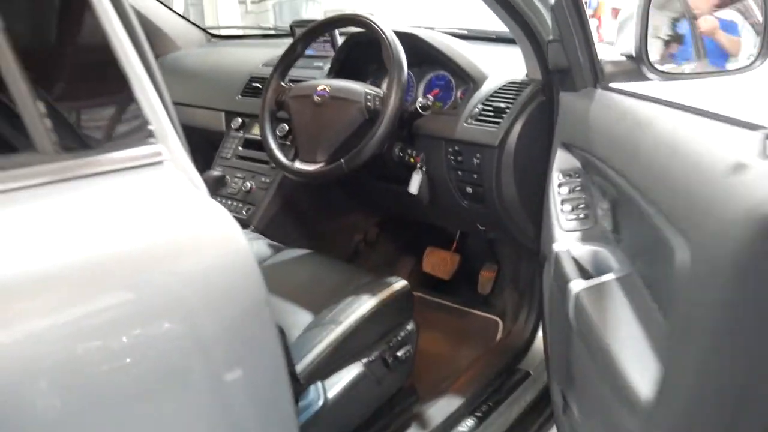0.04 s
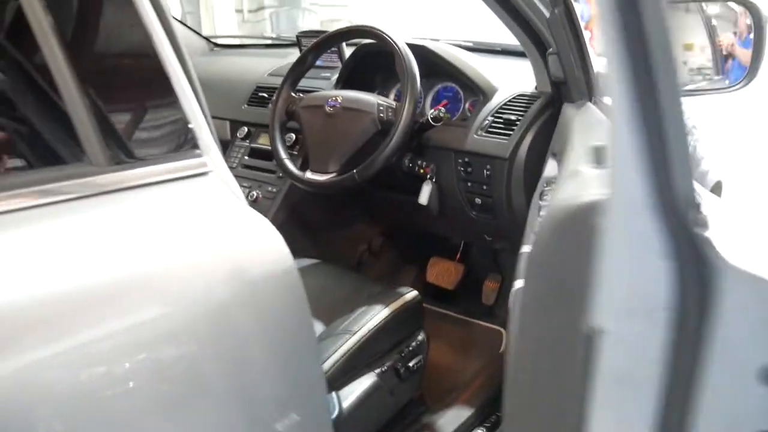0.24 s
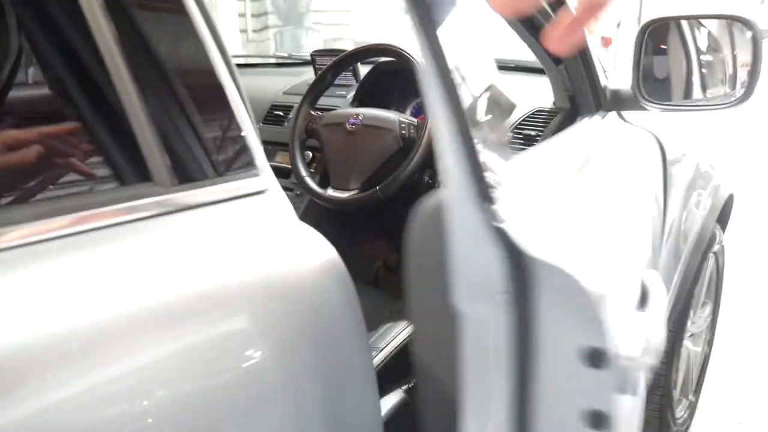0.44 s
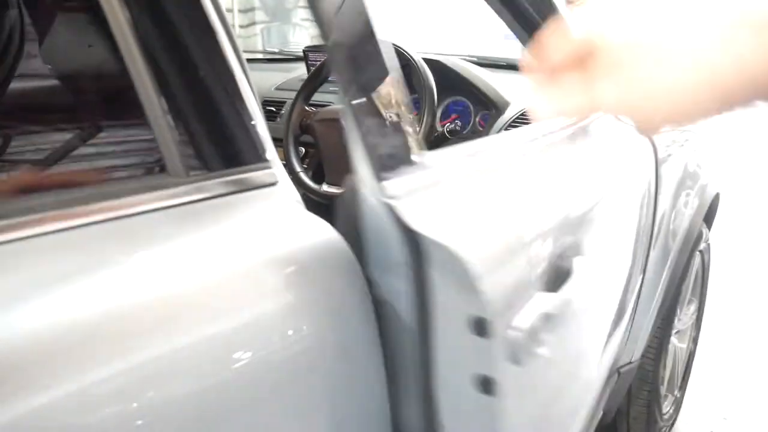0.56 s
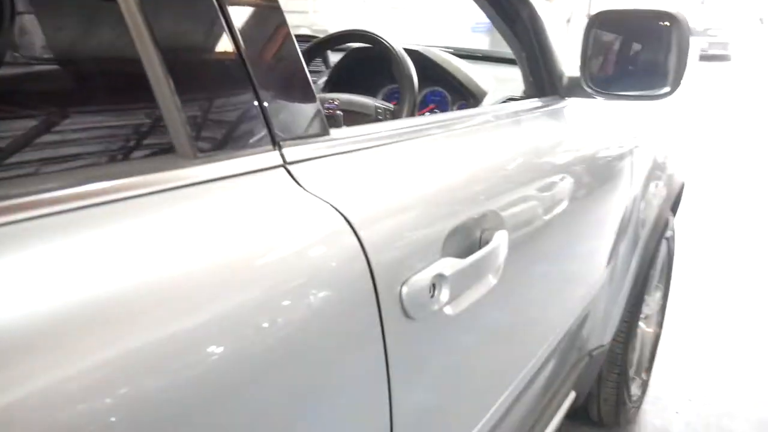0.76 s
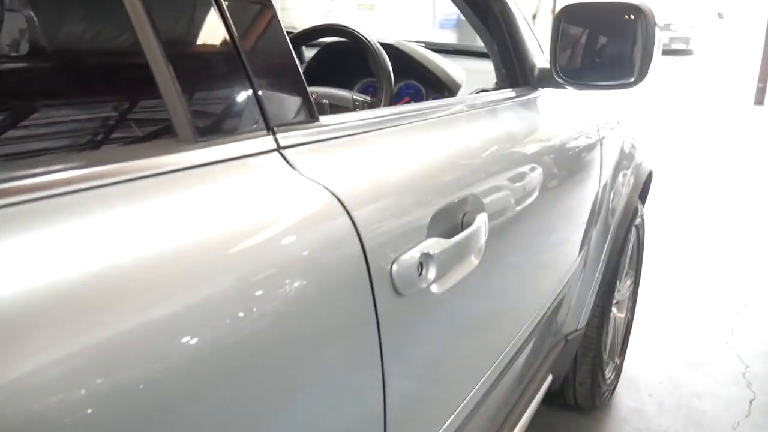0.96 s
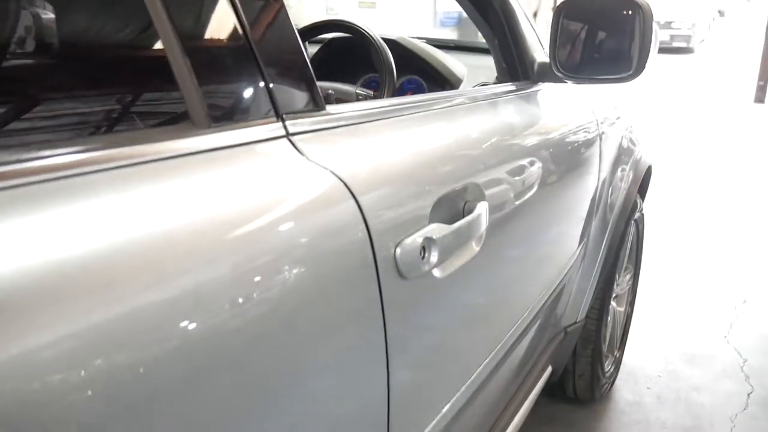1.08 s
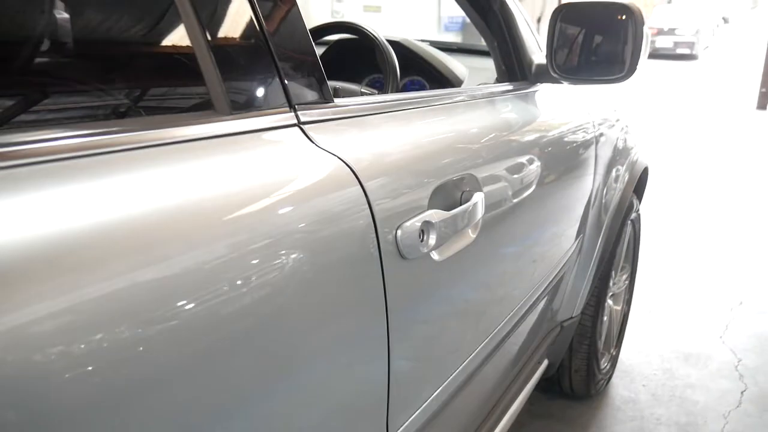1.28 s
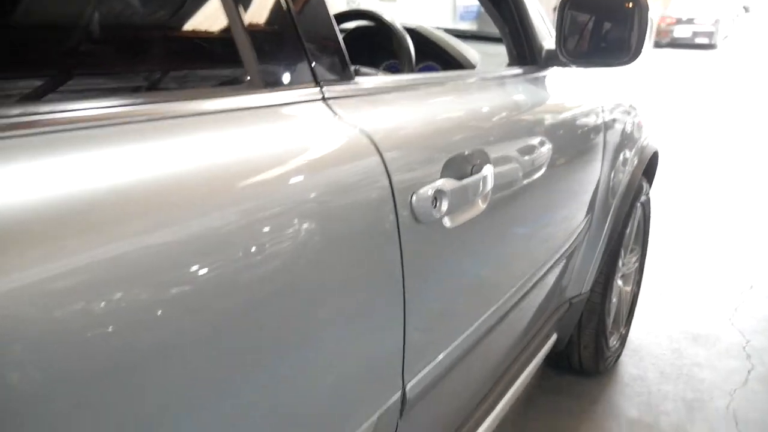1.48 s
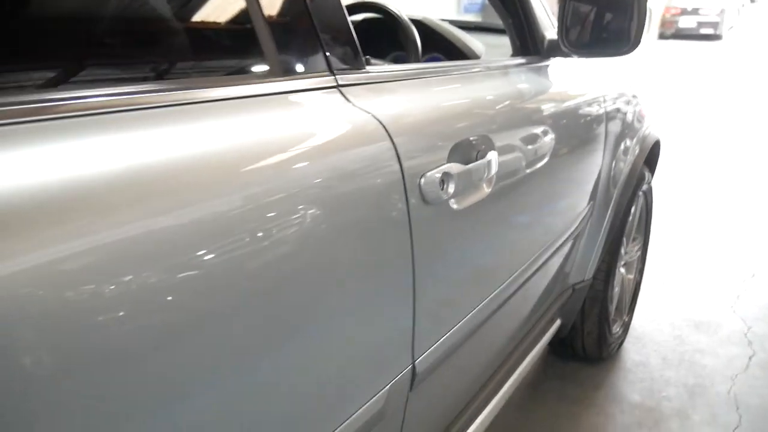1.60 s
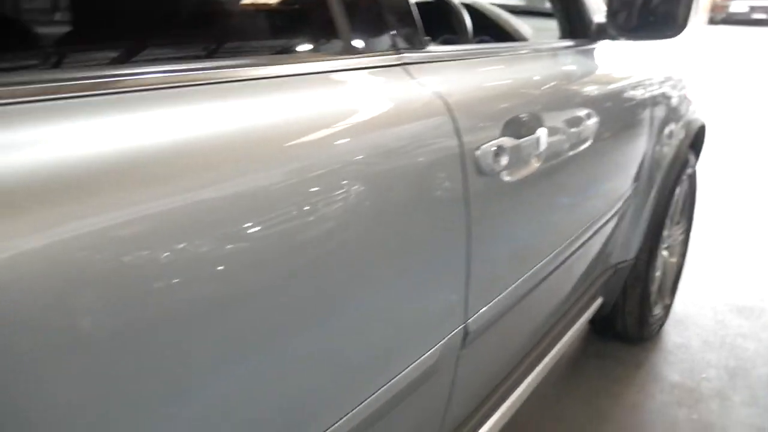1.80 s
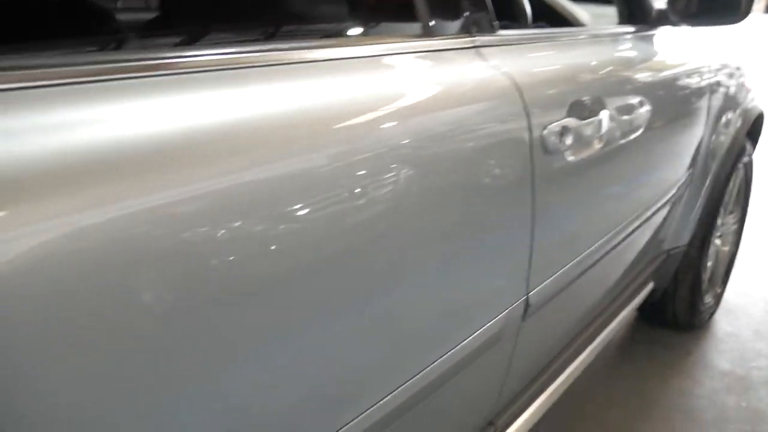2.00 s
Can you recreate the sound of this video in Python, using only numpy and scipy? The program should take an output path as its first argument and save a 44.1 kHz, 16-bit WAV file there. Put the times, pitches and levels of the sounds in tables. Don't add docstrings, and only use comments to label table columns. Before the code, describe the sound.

A car door swings shut with a solid double-latch thud, ringing through a large hall

```python
import sys
import numpy as np
from scipy import signal
from scipy.fft import rfft, irfft, next_fast_len
from scipy.io import wavfile
from scipy.ndimage import uniform_filter1d, map_coordinates

SR = 44100
rng = np.random.default_rng(int(sys.argv[2]) if len(sys.argv) > 2 else 0)


def dump_mix(stems):
    frames = np.atleast_2d(stems).T
    limited = np.clip(frames, -1, 1)
    pcm = np.round(limited * 32767).astype(np.int16)
    wavfile.write(sys.argv[1], SR, pcm)


def volts_from_db(level):
    exponent = np.asarray(level, float) / 20
    return 10 ** exponent


N = 89964
T_S = np.arange(N) / SR

# t/s, ring level/dB, clack level/dB
LATCH_CATCHES = [
    (.7235, -31.5, -27),
    (0.7265, -28, -31),
]
# t/s, ring level/dB, clack level/dB, crack level/dB
DOOR_BLOWS = [
    (0.7466, -22, -29, -31.5),
    (.7485, -27.5, -20.5, -32.5),
    (0.7604, -21.5, -29.5, -43),
    (0.7649, -22, -32, -40.5),
    (.7765, -24.5, -29.5, -46),
    (0.7842, -34, -26.5, -41),
]


def unit(x):
    return x / np.sqrt(np.mean(x ** 2) + 1e-20)


def along(points, hz):
    f, v = np.transpose(points)
    return np.interp(np.log(hz + 1), np.log(f + 1), v)


def curves(rows):
    s, *cols = np.transpose(rows)
    return [np.interp(T_S, s, c) for c in cols]


def wobble(rate_hz, size=N):
    knots = rng.standard_normal(int(size * rate_hz / SR) + 4)
    return map_coordinates(knots, [np.arange(size) * rate_hz / SR])


def filtered(x, response):
    m = next_fast_len(x.shape[-1] + SR // 2)
    spectrum = rfft(x, m) * response(np.fft.rfftfreq(m, 1 / SR))
    return irfft(spectrum, m)[..., :x.shape[-1]]


def coloured(x, points):
    return filtered(x, lambda hz: volts_from_db(along(points, hz)))


def low_cut(x, corner_hz):
    return filtered(x, lambda hz: 1 / (1 + (corner_hz / (hz + 1)) ** 6))


def rush(spectrum, patchy_db):
    z = signal.stft(rng.standard_normal(N), nperseg=512)[2]
    field = uniform_filter1d(rng.standard_normal(z.shape), size=6, axis=0)
    field = uniform_filter1d(field, size=8, axis=1)
    x = signal.istft(z * volts_from_db(patchy_db * unit(field)), nperseg=512)[1][:N]
    return unit(coloured(x, spectrum))


def decay(t, db, t60_s, rise_s):
    return volts_from_db(db - 60 * t / t60_s) * (1 - np.exp(-t / rise_s))


def add(x, s, db, hz, t60_s, rise_s, rough=0):
    t = np.arange(SR // 4 if hz > 300 else SR // 2) / SR
    phase = 2 * np.pi * hz * t + rough * wobble(102, size=len(t))
    mode = decay(t, db, t60_s, rise_s) * np.sin(phase)
    part = x[round(s * SR):][:len(t)]
    part += mode[:len(part)]


def bursts(rows, rise_s):
    return sum(decay(np.maximum(T_S - s, 0), db, t60_s, rise_s) for s, db, t60_s in rows)


def hum():
    # f/Hz, level/dB per Hz
    hum_spectrum = [(20, -7.5), (70, -1.5), (160, -10), (450, -23.5), (1500, -23.5), (3600, -25.5),
                    (8000, -39), (15600, -51)]
    # t/s, level/dB
    floor_level = [(0, 4.5), (.06, 1.5), (.13, 0.5), (2.04, 2)]
    level_db = -49.5 + curves(floor_level)[0] + .8 * wobble(3)
    return volts_from_db(level_db) * rush(hum_spectrum, patchy_db=1.2)


def hall(x):
    # f/Hz, t60/s
    hall_t60 = [(40, 0.63), (120, 0.96), (250, 0.91), (700, 0.75), (1500, 1.17), (3000, 1.42), (6000, 1.37),
                (12000, 0.83)]
    # f/Hz, level/dB
    hall_gain = [(40, -6), (120, -9), (250, 0.5), (700, -10.5), (1500, 0.5), (3000, -4), (6000, 2.5),
                 (14000, 5)]
    delay_s, length = .012, SR * 3 // 2
    hz, t, z = signal.stft(rng.standard_normal(length), SR, nperseg=1024)
    fade = volts_from_db(-60 * t / along(hall_t60, hz)[:, None])
    fade /= np.sqrt(np.mean(fade ** 2, axis=1, keepdims=True) * length)
    fade *= volts_from_db(along(hall_gain, hz))[:, None]
    tail = np.pad(signal.istft(z * fade, SR, nperseg=1024)[1], (round(delay_s * SR), 0))
    return signal.fftconvolve(x, tail)[:N]


def echo(boom):
    # f/Hz, level/dB
    slam_colour = [(150, -32), (260, 0), (689, -1), (1390, -14), (1680, -13), (3680, -20), (5100, -32.5),
                   (15500, -56)]
    slam_db, boom_db = 43.5, -9
    blows = np.zeros(N)
    for row in [*LATCH_CATCHES, *DOOR_BLOWS]:
        blows[round(row[0] * SR)] = volts_from_db(row[2] + slam_db)
    return hall(coloured(blows, slam_colour) + volts_from_db(boom_db) * boom)


def handling():
    # t/s, effort level/dB
    rustle = [(1.1, -40), (1.15, -6.5), (1.23, -5), (1.31, 1), (1.4, -3), (1.5, -11), (1.6, -44)]
    # f/Hz, level/dB per Hz
    cloth_spectrum = [(100, 2), (300, 1.5), (700, -13), (2500, -15.5), (4300, -7.5), (6000, -22),
                      (12000, -35)]
    # t/s, level/dB, t60/s
    snaps = [(.012, -62, .3), (1.152, -50, .01), (1.165, -50, .01), (1.17, -49, .008), (1.175, -45, .018),
             (1.198, -51, .015), (1.209, -52, .01), (1.8875, -47.5, .018), (1.9568, -45, .008)]
    # f/Hz, level/dB per Hz
    snap_spectrum = [(1500, -12), (2800, -2), (4000, 0), (5500, -5), (8500, -11), (15000, -24)]
    # t/s, level/dB, f/Hz, t60/s
    ticks = [(1.152, -30.5, 3540, 0.015), (1.165, -35, 3250, .006), (1.1695, -36, 3970, 0.013),
             (1.1745, -37, 3560, 0.011), (1.1765, -37, 4160, .006), (1.185, -42, 3800, 0.027),
             (1.1975, -40, 3900, 0.009), (1.2015, -35, 3800, .006), (1.209, -37, 3330, 0.0073),
             (1.8875, -40.5, 3930, 0.017), (1.8896, -38.5, 3240, 0.011), (1.9568, -32, 1410, 0.021),
             (1.956, -32.5, 3950, .007), (1.957, -34, 2940, 0.0065), (1.964, -38, 3100, .008)]
    # t/s, level/dB, length/s
    taps = [
        (1.9569, -23, .0016),
        (1.9815, -36, .004),
    ]
    # t/s, level/dB, f/Hz, t60/s, rise/s
    tap_ring = [
        (1.959, -28.5, 82, .06, .001),
        (1.972, -38, 62, .2, .003),
    ]
    effort_db, = curves(rustle)
    x = volts_from_db(-47.5 + effort_db + 0.53 * wobble(90)) * rush(cloth_spectrum, patchy_db=2.5)
    x += bursts(snaps, rise_s=0.00047) * rush(snap_spectrum, patchy_db=1.5)
    for row in ticks:
        add(x, *row, rise_s=.0005, rough=0.13)
    for row in tap_ring:
        add(x, *row)
    for s, db, length_s in taps:
        u = np.maximum(T_S - s, 0) / length_s
        x -= volts_from_db(db) * np.minimum(u * 13, 1) * np.exp(-3 * u)
    return x


def swing():
    # t/s, hinge f/Hz, speed level/dB
    motion = [(.14, 520, -25), (.2, 560, -2.5), (.27, 640, -1.5), (.34, 740, 0.5), (.42, 820, 0),
              (.54, 895, 0), (.64, 900, 0), (.69, 894, -0.5), (.73, 900, 0)]
    # f/Hz, level/dB per Hz
    air_spectrum = [(20, 2), (60, -2), (250, -8.5), (700, -15), (1700, -16.5), (3000, -44.5)]
    # f/Hz, level/dB per Hz
    edge_spectrum = [(1200, -19), (2500, -2.5), (4200, 0), (6000, -7.5), (9000, -21), (13000, -30),
                     (15500, -30)]
    # t/s, level/dB, f/Hz, t60/s
    strap = [(.155, -50, 1563, 0.29), (.198, -39.5, 227.4, 0.15), (.2, -49.5, 529, 0.2),
             (.255, -49, 612, 0.27), (.525, -41, 912, 0.085), (0.561, -38, 294, 0.12),
             (.2, -48.5, 812, 0.27), (.2, -40, 1785, 0.046), (0.319, -44, 1730, 0.11)]
    whine_hz, speed_db = curves(motion)
    speed_db = speed_db - 60 * (T_S > motion[-1][0])
    air_db = -47 + speed_db - 1.5 * (T_S > 0.6)
    air = volts_from_db(air_db) * rush(air_spectrum, patchy_db=3.0)
    edge_db = -53.5 + 4.4 * speed_db + 1.0 * wobble(120.6)
    edge = volts_from_db(edge_db) * rush(edge_spectrum, patchy_db=-1.5)
    whine_db = -59 + speed_db + 4 * wobble(20.1)
    whine = volts_from_db(whine_db) * np.sin(2 * np.pi * np.cumsum(whine_hz + 14 * wobble(42.8)) / SR)
    for row in strap:
        add(air, *row, rise_s=.004, rough=0.72)
    return air + edge + whine


def thud():
    # t/s, level/dB, f/Hz, t60/s, rise/s
    booms = [(0.7568, -11.0, 60, 0.328, 0.0149), (0.7602, 3.0, 161, 0.029, 0.0129),
             (0.773, 3.0, 154, 0.12, 0.0445), (0.7765, -7.5, 107, 0.216, 0.0027),
             (0.7791, -18.0, 189, 0.146, 0.002), (0.7809, -7.5, 146, 0.249, 0.05),
             (0.7981, -11.0, 101, 0.22, 0.0049), (0.8241, 2.0, 45, 0.072, 0.05),
             (0.8249, -17.5, 140, 0.239, 0.0021), (0.8688, -17.5, 89, 0.213, 0.003),
             (0.8853, -14.0, 76, 0.045, 0.0027), (0.9199, -22.5, 75, 0.081, 0.001),
             (.97, -27, 65, 0.197, 0.0043), (.95, -31.5, 150, 0.58, 0.025),
                (1.035, -36, 110, 0.26, 0.011)]
    x = np.zeros(N)
    for row in booms:
        add(x, *row)
    return x


def slam():
    # f/Hz, level/dB per Hz
    crack_spectrum = [(2000, -5.5), (4000, -4), (7000, -11.5), (15000, -21.5)]
    # f/Hz, level/dB per Hz
    clack_spectrum = [(120, -11.5), (250, 10.5), (600, -5.5), (1300, -7), (2500, -9), (3800, -17),
                      (4600, -20.5), (9000, -58)]
    # t/s,
    # level/dB, f/Hz, t60/s
    rattle = [(.7243, -25, 490, .07), (.7243, -25, 1560, .08), (.7265, -30, 1800, .03),
              (.727, -30, 900, .04), (.7275, -33, 3400, .02), (.7478, -17, 690, .05),
              (.748, -14, 385, .045), (.7495, -26, 2400, .01), (.7515, -28, 3600, .012),
              (.7535, -25, 1000, .05), (.7555, -31, 2300, .012), (.7645, -19, 690, .05),
              (.7662, -24, 3800, .014), (.767, -26, 1750, .02), (.7665, -32, 4600, .008),
              (.7755, -28, 1800, .015), (.7765, -18, 455, .11), (.7845, -23, 1600, .01),
              (.7848, -26, 2700, .008), (.7865, -30, 3650, .012), (.7935, -32, 3600, .014),
              (.822, -28, 600, .05)]
    # f/Hz, level/dB, t60/s
    striker = [(7600, -57, .12), (8250, -60, .1), (9500, -60, .12), (10700, -62, .22), (12400, -63, .22),
               (13200, -64, .22), (14300, -64, .22)]
    # f/Hz, level/dB, t60/s
    pawl = [(484, -4, .08), (690, -5, .06), (900, -7, .05), (1534, -5, .09), (1800, -7, .05),
            (2030, -13, .05), (2767, -12, .05), (3515, -8, .06)]
    # f/Hz, level/dB, t60/s
    skin = [(390, -5, .045), (463, -3, .14), (582, -2, .1), (697, -3, .08), (750, -7, .05), (900, -8, .08),
            (1030, -8, .08), (1540, -15, .05), (1710, -16, .05), (2050, -22, .04), (2800, -15, .04),
            (3650, -21, .04)]
    crack_t60_s, clack_t60_s, striker_s = 0.036, 0.074, .762
    cracks = [(s, crack_db, crack_t60_s) for s, _, _, crack_db in DOOR_BLOWS]
    door = bursts(cracks, rise_s=0.00039) * rush(crack_spectrum, patchy_db=3.5)
    clack = low_cut(rush(clack_spectrum, patchy_db=2.0), 230)
    thin_clack = low_cut(clack, 400)
    for hits, noise in (LATCH_CATCHES, thin_clack), (DOOR_BLOWS, clack):
        door += bursts([(row[0], row[2], clack_t60_s) for row in hits], rise_s=0.00013) * noise
    for row in rattle:
        add(door, *row, rise_s=.0003, rough=0.35)
    for hz, db, t60_s in striker:
        add(door, striker_s, db, hz, t60_s, rise_s=.006, rough=0.6)
    for hits, modes in (LATCH_CATCHES, pawl), (DOOR_BLOWS, skin):
        for row in hits:
            for hz, db, t60_s in modes:
                mode_db = row[1] + db + rng.normal(0, 1.4)
                add(door, row[0], mode_db, hz, t60_s, rise_s=.0008, rough=1.0)
    return door


def ports(near, diffuse):
    # f/Hz, level/dB
    side_colour = [(50, -30.5), (200, -31.5), (500, -23.5), (1500, -21), (5000, -17.5), (9000, -8)]
    # f/Hz, level/dB per Hz
    hiss_spectrum = [(5000, -120), (7000, -7), (10000, -13), (15000, -13)]
    near_side_db, hiss_db, scatter_t60_s = -12, -77, 0.046
    t = np.arange(SR // 10) / SR
    scatter = rng.standard_normal(len(t)) * volts_from_db(-60 * t / scatter_t60_s)
    scatter /= np.linalg.norm(scatter)
    apart = signal.fftconvolve(diffuse + volts_from_db(near_side_db) * near, scatter)[:N]
    side = coloured(apart, side_colour) + volts_from_db(hiss_db) * rush(hiss_spectrum, patchy_db=-1.0)
    mid = near + diffuse
    return np.array([mid + side, mid - side])


def scene():
    door, boom = slam(), thud()
    return ports(door + boom, echo(boom) + swing() + handling() + hum())


def roll_off(x):
    return signal.sosfilt(signal.butter(12, 15760, fs=SR, output="sos"), x)


def record(dry):
    port_hz, width_hz, port_db = 3725, 310, 4
    clip_level, knee, band_hz = .63, 8, 15780

    def port(f):
        damping = 1j * f * width_hz
        return 1 + (volts_from_db(port_db) - 1) * damping / (port_hz ** 2 - f * f + damping)

    x = filtered(dry, port)
    clipped = x / (1 + np.abs(x / clip_level) ** knee) ** (1 / knee)
    mix = filtered(clipped, lambda f: np.clip((band_hz - f) / 200, 0, 1))
    return roll_off(mix)


dry = scene()
out = record(dry)
dump_mix(out)
```